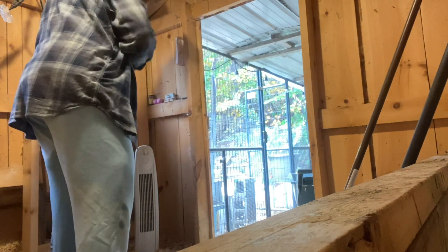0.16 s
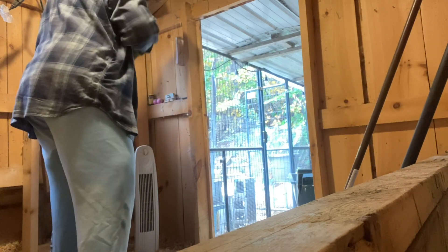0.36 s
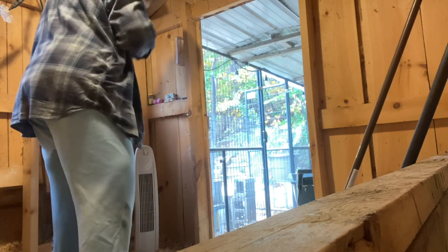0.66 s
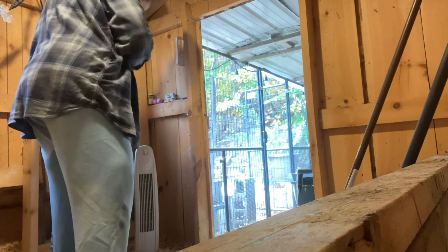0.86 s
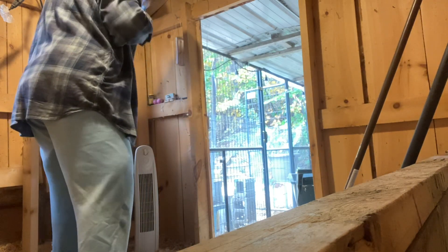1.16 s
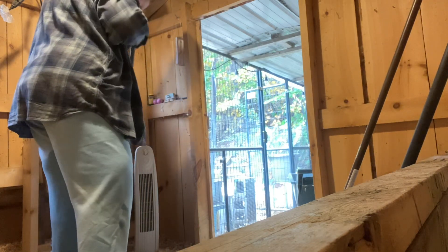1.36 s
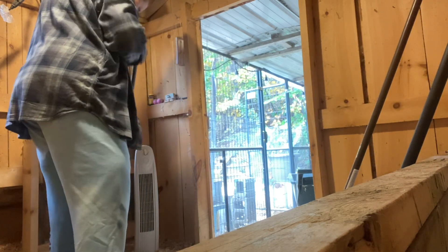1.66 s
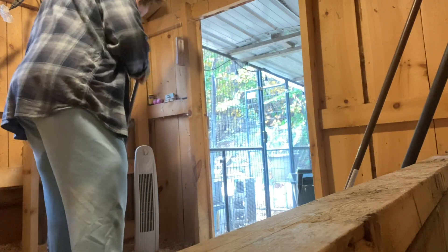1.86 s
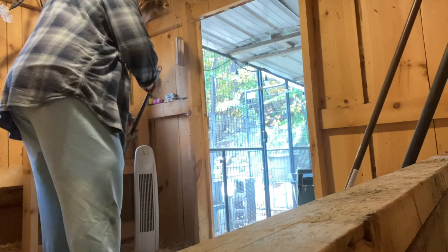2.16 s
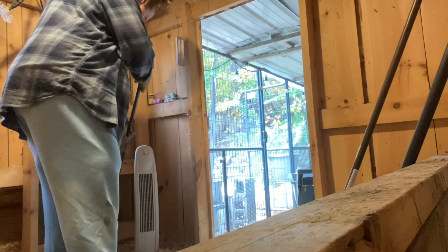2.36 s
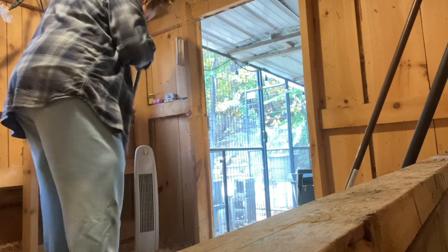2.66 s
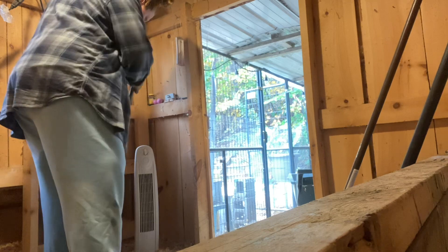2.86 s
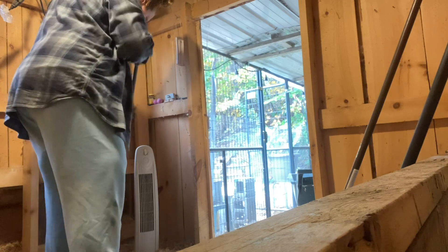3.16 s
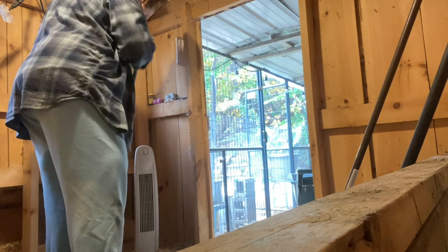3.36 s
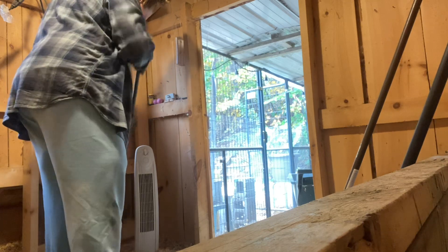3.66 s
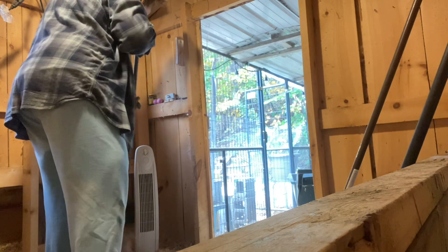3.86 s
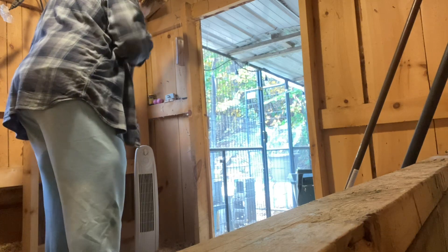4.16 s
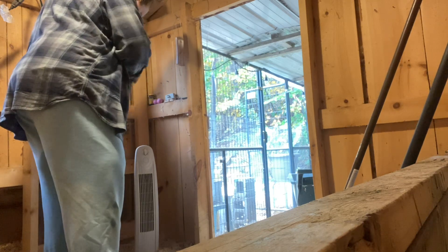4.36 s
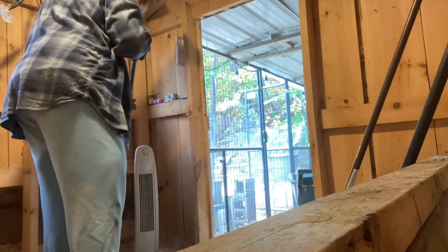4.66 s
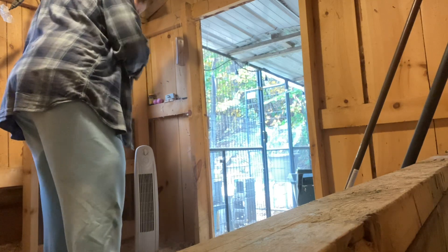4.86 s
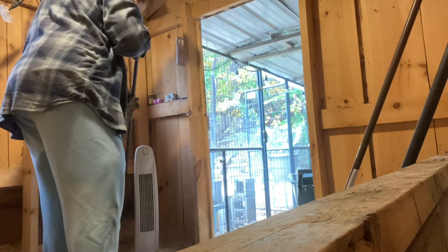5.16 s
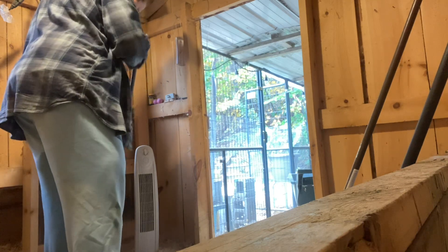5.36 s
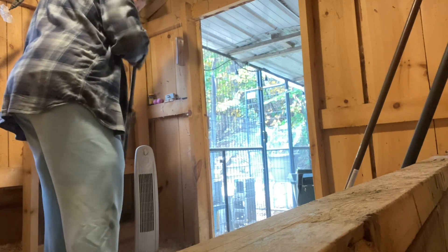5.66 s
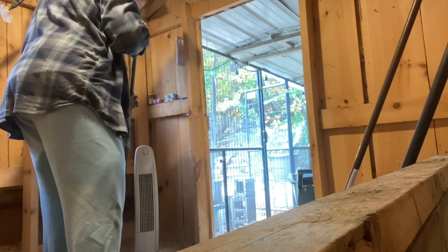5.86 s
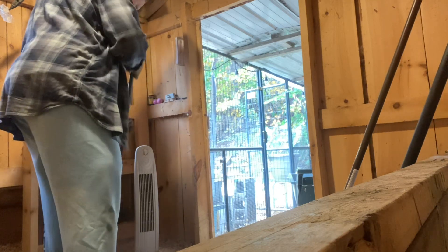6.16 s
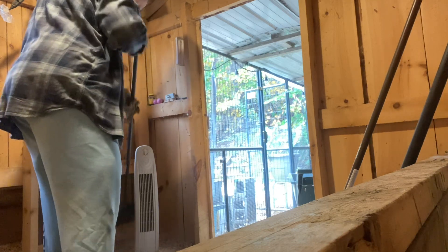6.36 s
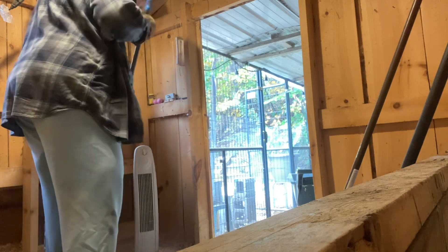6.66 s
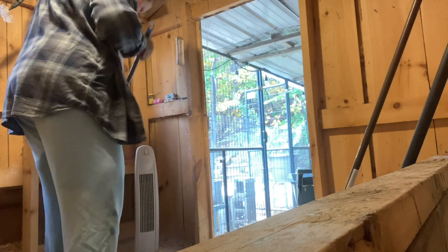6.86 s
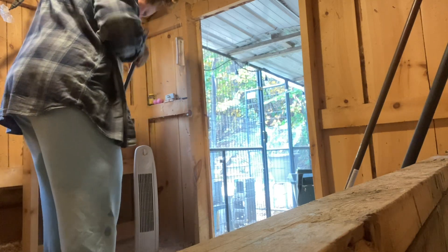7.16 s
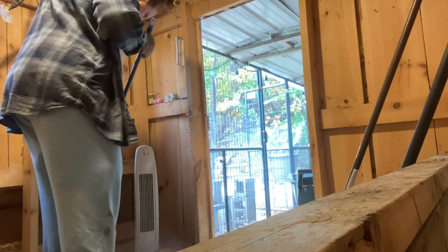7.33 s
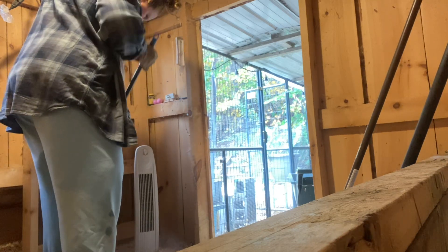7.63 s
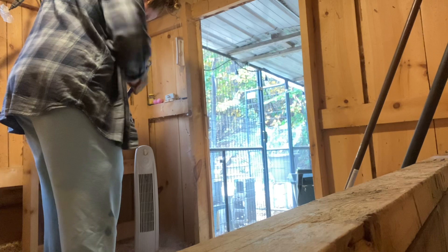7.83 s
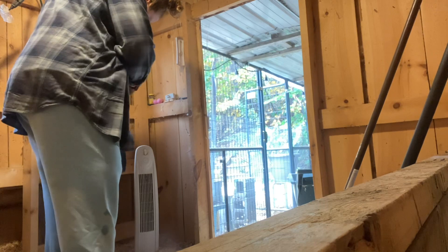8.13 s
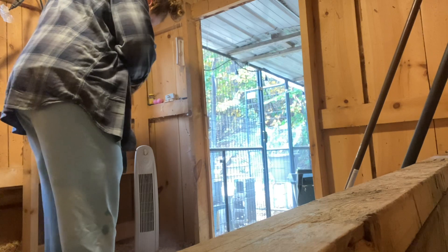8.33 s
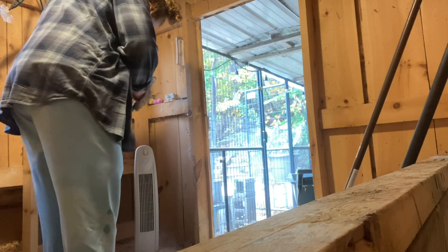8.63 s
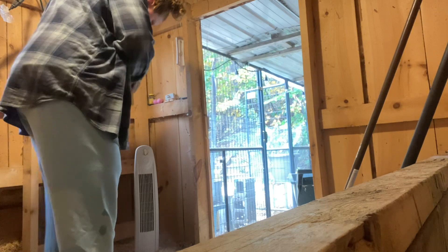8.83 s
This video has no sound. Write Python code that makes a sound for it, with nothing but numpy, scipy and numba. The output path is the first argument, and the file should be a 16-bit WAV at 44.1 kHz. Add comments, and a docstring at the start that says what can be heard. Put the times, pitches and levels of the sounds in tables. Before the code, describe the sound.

A stiff broom sweeps the plank floor of a small wooden coop in quick, scratchy strokes over a low rumble of feet. The broom head knocks on a hollow panel now and then. About two thirds through, the handle cracks sharply against the wall, two faint bird notes follow outside, and the sweeping carries on. It is heard in stereo, with a short echo and a faint outdoor hush.

```python
"""A stiff broom sweeps the plank floor of a small wooden coop, heard by two microphones a little apart.
From the start, bristles hiss and drag on the boards over a rumble of feet and a faint outdoor hush.
From 0.8 s on, the broom head now and then knocks on a hollow panel. At 6.4 s the handle cracks against
the wall, two faint bird notes follow outside, and the sweeping goes on to the end.
The walls add a short echo, and a limiter holds down the loudest knocks."""
import sys
import numpy as np
from scipy import signal
from scipy.fft import rfft, irfft, next_fast_len
from scipy.io import wavfile
from scipy.ndimage import uniform_filter1d, minimum_filter1d
from numba import njit

SR = 44100
rng = np.random.default_rng(int(sys.argv[2]) if len(sys.argv) > 2 else 0)


def bounce(signal):
    """Save signal as a 16-bit WAV file at the path given by the first command-line argument."""
    frames = np.transpose(np.atleast_2d(signal))
    limited = np.clip(frames, -1, 1)
    pcm = np.round(limited * 32767).astype(np.int16)
    wavfile.write(sys.argv[1], SR, pcm)


N = 396459
TIME_S = np.arange(N) / SR
SIZE = next_fast_len(N + SR)
HZ = np.arange(SIZE // 2 + 1) * SR / SIZE

# The broom head hits the panel: start_s, blow_db, upper_twin_db, low_overtones_db, high_overtones_db,
# boom_db, joists_db. The boom has its own level; the other parts are added to blow_db.
KNOCKS = [(0.807, -3, 2.5, -10, -27, -61, 2), (0.861, -11.5, 4, -14, -15, -64, -12),
          (0.915, -27.5, 4, -17, -9, -57, -3), (1.948, 3, -0.5, -13, -11, -14.5, 2),
          (2.492, -13.5, 0, -16.5, -17, -52, -7.5), (2.741, -23, -22, -23, -27, -23.5, 8.5),
          (2.976, 2.5, -2.5, -15, -25, -46.5, -6), (3.017, -25, -23, 0.5, -7, -51, 2),
          (3.058, -10.5, -1.5, -14.5, -21.5, -53, 2.5), (3.333, -4.5, 0, -23.5, -26, -38.5, 3),
          (3.375, -14.5, -3.5, -22, -42, -40, -2), (3.494, -27, -8.5, -3, -11, -45.5, -4),
          (4.294, 4.5, -2, -17, -24, -51, -7), (4.445, -29.5, -3, -27, -42, -42.5, 0),
          (5.497, 2, 0.5, -10, -9.5, -30.5, -1), (5.54, -17, 4.5, -1.5, -12.5, -55, 3),
          (5.592, -25.5, 10, -20, -16.5, -57.5, 0), (5.642, -26.5, 5.5, -27, -32, -59, 1.5),
          (6.154, 3.5, 0.5, -6.5, -16, -46, 3), (7.826, -23.5, -25, 1, -17, -28, 2),
          (7.878, 3.5, -3, -11, -30, -29, 0.5), (7.923, -29, -24, -7, -11, -32, -4),
          (7.959, -30, 2, -13, -23, -50, 1)]


def undb(db):
    """Turn decibels into a gain."""
    return 10 ** (np.asarray(db, float) / 20)


def unit(x):
    """Scale to an average (rms) level of 1."""
    return x / np.sqrt(np.mean(x ** 2))


def curve(table):
    """Join rows of pitch_hz, level_db into a gain for every frequency."""
    hz, db = np.transpose(table)
    return undb(np.interp(np.log(HZ + 1), np.log(hz), db))


def colour(x, gain):
    """Filter by a gain for each frequency."""
    return irfft(rfft(x, SIZE) * gain, SIZE)[..., :N]


def only(x, kind, hz):
    """Let only a band, or only the highs, through."""
    return signal.sosfilt(signal.butter(2, hz, kind, fs=SR, output="sos"), x)


def walk(rate_hz):
    """A smooth random wobble, about 1 in size."""
    hold = int(SR / rate_hz)
    steps = np.repeat(rng.standard_normal(N // hold + 1), hold)
    return unit(uniform_filter1d(uniform_filter1d(steps, hold), hold)[:N])


def blows(times, db, contact_s=0):
    """One smooth push at each time; longer contact sounds duller."""
    x = np.zeros(N)
    x[np.clip((times * SR).astype(int), 0, N - 1)] = undb(db)
    push = np.hanning(int(contact_s * SR) + 3)
    return np.convolve(x, push / push.sum())[:N]


def fading(x, fade_s):
    """Each push dies away, by 60 dB in fade_s."""
    return signal.lfilter([1], [1, -np.exp(-np.log(1000) / (fade_s * SR))], x)


def burst(x, fade_s, low_hz, high_hz):
    """Each push sets off a short tail of noise."""
    return only(fading(x, fade_s) * rng.standard_normal(N), "band", [low_hz, high_hz])


def ring(x, tones):
    """Struck wood rings in fading tones of alternating sign; x may hold one row for each tone."""
    out, pushes = 0, np.broadcast_to(x, (len(tones), N))
    for k, (hz, db, fade_s) in enumerate(tones):
        decay, angle = np.exp(-np.log(1000) / (fade_s * SR)), 2 * np.pi * hz / SR
        tone = signal.lfilter([0, decay * np.sin(angle)], [1, -2 * decay * np.cos(angle), decay ** 2],
                              pushes[k])
        out = out + (-1) ** k * undb(db) * tone
    return out


@njit
def moving_band(x, hz, width_hz):
    """Let through a band whose centre may move every sample."""
    out, band_state, low_state = np.empty(len(x)), 0., 0.
    for i in range(len(x)):
        step, damping = np.pi * hz[i] / SR, width_hz / hz[i]
        band = (band_state + step * (x[i] - low_state)) / (1 + step * (step + damping))
        band_state = 2 * band - band_state
        low_state += 2 * step * band
        out[i] = damping * band
    return out


def wandering_bands(x, bands, rate_hz):
    """Rubbed resonances: each drifts about 11% in pitch, and swells and fades on its own."""
    out = 0
    for hz, width_hz, db in bands:
        centre_hz = hz * np.exp(0.11 * walk(rate_hz))
        band = unit(np.array([moving_band(row, centre_hz, float(width_hz)) for row in x]))
        out = out + band * undb(db + 2.2 * walk(rate_hz))
    return out


def touch(start, length, press, lift, step=1):
    """For each stroke: how firmly it touches and how far along it is, both 0 to 1."""
    since, length = TIME_S[::step] - start[:, None], length[:, None]
    down = np.clip(since / np.maximum(np.reshape(press, (-1, 1)), .01), 0, 1)
    up = np.clip((length - since) / np.maximum(np.reshape(lift, (-1, 1)), .01), 0, 1)
    return (np.sin(np.pi / 2 * down) * np.sin(np.pi / 2 * up)) ** 2, np.clip(since / length, 0, 1)


def yard():
    """A faint outdoor hush, unrelated left and right."""
    # Colour of the hush: pitch_hz, level_db
    hush = [(24, -24.5), (40, -7.5), (88, 6), (391, -25), (1210, -31.5), (8370, -52.5), (10200, -55),
            (11800, -46), (14000, -63)]
    return unit(colour(rng.standard_normal((2, N)), curve(hush))) * undb(-63.5)


def birds():
    """Two soft notes outside: a low one that sags, then a high steady one."""
    # Bird notes: start_s, length_s, pitch_hz, fall_hz, level_db, octave_db
    notes = [(6.55, .13, 560, 40, -54, -4), (6.71, .1, 3050, 0, -71, -40)]
    out = 0
    for start, length, hz, fall_hz, db, octave_db in notes:
        progress = np.clip((TIME_S - start) / length, 0, 1)
        phase = 2 * np.pi * length * (hz * progress - fall_hz * progress ** 2 / 2)
        tone = np.sin(phase) + undb(octave_db) * np.sin(2 * phase)
        out = out + undb(db) * np.sin(np.pi * progress) * tone
    return out


def floor_rumble():
    """The floor rumbles under the feet and shudders after each knock."""
    # Colour of the rumble: pitch_hz, level_db
    depth = [(20, -32), (35, -8.5), (50, -8), (75, 0.5), (130, -11), (170, -4.5), (300, -19.5), (600, -75)]
    # Rumble of the feet: time_s, level_db
    feet = [(0.0, -50.5), (0.75, -50), (0.9, -44.5), (1.33, -62), (1.65, -49), (2.15, -44.5), (2.45, -48),
            (2.73, -50), (2.95, -43.5), (3.1, -49.5), (4.23, -59.5), (4.41, -56), (5.06, -49), (5.3, -54.5),
            (5.6, -46.5), (6.0, -52), (6.41, -35.5), (6.79, -65.5), (7.76, -56), (8.01, -48), (8.19, -51.5),
            (8.99, -48)]
    rumble = unit(colour(rng.standard_normal((2, N)) * undb(2 * walk(6)), curve(depth)))
    start, blow_db = np.transpose(KNOCKS)[:2]
    shudder = fading(blows(start, blow_db - 38.5, 0.0061), fade_s=1)
    return rumble * (undb(np.interp(TIME_S, *np.transpose(feet))) + shudder)


def board_hums():
    """Single boards hum with a wavering tone while they are rubbed."""
    # Humming boards: start_s, length_s, pitch_hz, level_db
    hums = [(0.0, 0.29, 585, -40), (0.313, 0.21, 570, -47), (0.543, 0.25, 369, -41.5),
            (1.254, 0.2, 161, -53), (3.744, 0.2, 333, -41.5), (3.736, 0.3, 163.4, -47),
            (4.08, 0.18, 323, -33.5), (4.563, 0.27, 330, -42.5), (5.047, 0.099, 352, -38.5),
            (5.79, 0.18, 144, -40), (6.5, 0.3, 100, -40.5), (6.868, 0.275, 262.8, -42),
            (6.994, 0.27, 110.5, -45), (7.225, 0.3, 148.9, -47.5), (7.255, 0.26, 296, -44),
            (7.655, 0.17, 291, -30), (8.143, 0.17, 588, -47.5), (8.383, 0.28, 575, -45),
            (8.45, 0.19, 240, -41), (8.63, 0.24, 857, -53.5), (8.859, 0.14, 585, -35)]
    start, length, hz, db = np.transpose(hums)
    waver_hz, fade_s = 24, 0.1
    waver = signal.lfilter(*signal.butter(2, waver_hz, fs=SR), rng.standard_normal((2, N)))
    tones = np.cos(2 * np.pi * hz[:, None] * TIME_S + 1.23 * unit(waver[0])) * undb(2.3 * unit(waver[1]))
    contact, _ = touch(start, length, fade_s, fade_s)
    return undb(db) @ (contact * tones)


def ticks():
    """Bristles, grit and the broom head make tiny hard clicks."""
    # Hard contacts: start_s, level_db, brightness_db
    contacts = [(0.801, -40, -13), (1.0002, -32, -35), (1.4548, -52, -24), (1.531, -45, -27),
                (1.811, -43, -18), (1.9454, -51, -12), (1.996, -39, -37), (2.97, -57, -20),
                (3.328, -40, -13), (3.487, -40.5, -17), (3.835, -52, -14), (4.287, -35.5, -34),
                (4.871, -38, -25), (5.203, -51, 3), (6.1474, -51, -20), (6.837, -48, -2), (7.39, -55, -16),
                (7.876, -32, -25), (8.9115, -53, -20)]
    start, db, bright_db = np.transpose(contacts)
    grit, fade_s = rng.standard_normal((2, N)), 0.045
    body = unit(only(grit[0], "band", [900, 3200]))
    edge = unit(np.diff(grit[1], prepend=0)) * undb(-2.5)
    return fading(blows(start, db), fade_s) * body + fading(blows(start, db + bright_db), fade_s) * edge


def swishes_and_cracks():
    """Short grainy swishes of straw, and brief sharp cracks as the broom head hits the panel."""
    # Swishes and cracks: start_s, length_s, pitch_hz, width_hz, rise_octaves, level_db
    sounds = [(0.755, 0.079, 3500, 2500, 0.053, -55), (1.454, 0.081, 2050, 500, 0.03, -55),
              (2.228, 0.1, 4500, 3000, 0, -49), (2.434, 0.031, 2200, 500, 0, -42),
              (2.443, 0.067, 3600, 900, .3, -48.5), (2.749, 0.14, 500, 704, 0, -38.5),
              (2.756, 0.095, 1990, 1500, 0, -43), (3.572, 0.088, 3870, 2500, 0, -42.5),
              (3.832, 0.092, 3380, 1800, 0.25, -44), (4.958, 0.083, 4050, 700, 0.037, -54.5),
              (4.97, 0.04, 2040, 500, 0, -51), (5.037, 0.038, 2100, 500, 0, -50),
              (5.192, 0.092, 3530, 2560, 0, -49), (5.44, 0.037, 2000, 594, 0.44, -47),
              (5.06, 0.035, 450, 250, 0.042, -47), (7.839, 0.037, 500, 400, 0, -38),
              (5.484, 0.012, 880, 490, 0.032, -25), (5.493, 0.0049, 2200, 880, 0.13, -22.5),
              (5.922, 0.041, 2200, 352, 0, -52), (6.19, 0.22, 4330, 2500, 0.044, -59),
              (7.005, 0.061, 2270, 400, 0.074, -62), (7.6, 0.033, 4500, 2500, 0, -50),
              (7.718, 0.11, 2150, 500, .1, -56), (7.811, 0.039, 1660, 1780, 0.035, -36.5),
              (7.876, 0.003, 2270, 810, 0.067, -26.5), (7.877, 0.0065, 5440, 5000, 0.038, -45)]
    grit = rng.standard_normal(N) * undb(0.6 * np.minimum(rng.exponential(size=N), 6))
    out = np.zeros(N)
    for start, length, hz, width_hz, rise, db in sounds:
        progress = np.linspace(0, 1, int(length * SR))
        span = slice(int(start * SR), int(start * SR) + len(progress))
        centre_hz = hz * 2 ** (rise * (progress - .5))
        band = moving_band(grit[span], centre_hz, float(width_hz))
        band = unit(moving_band(band, centre_hz, 2. * width_hz))
        out[span] += undb(db) * np.sin(np.pi * progress ** 0.74) * band
    return out


def handle_rap():
    """The handle grazes, hits and rebounds harder: the wall rings and loose boards rattle."""
    # Handle on the wall: start_s, blow_db
    raps = [(6.383, -14)]
    # Tones of the wall planks: pitch_hz, level_db, fade_s
    wall = [(309, 9.5, 0.24), (360, 19, 0.195), (430.4, 15, 0.28), (575, -13.5, 0.73), (670, -18, 0.25),
            (1110, -23, 0.15), (1120, 17.5, 0.066), (1310, 7, 0.1), (1790, 3, 0.058)]
    start, db = np.transpose(raps)
    graze = blows(start - .008, db - 22, 0.00042)
    hit = blows(start - .004, db - 14.5, 0.0007)
    rebound = blows(start - .0005, db - 12.5, 0.00033)
    push = graze + hit + rebound
    rattle = burst(push, 0.21, 200, 640) * undb(22)
    crack = burst(push, 0.056, 770, 3330) * undb(12.5)
    snap = burst(blows(start - .004, db), 0.075, 3300, 14000) * undb(-17)
    tail = burst(push, 0.62, 1100, 8500) * undb(-21)
    return ring(push, wall) * undb(-7.5) + rattle + crack + snap + tail


def panel_knocks():
    """The broom head hits a hollow panel: two close tones throb, and the wood around them joins in."""
    # Ringing parts, each with: pitch_hz, level_db, fade_s
    twins = [(245.4, -2, 0.13), (278.2, 1.5, 0.091)]  # the panel's two close tones
    overtones = [(335, 6.5, 0.042), (427, 3, 0.014), (390, 1, 0.036), (533, -9, 0.05), (587, -9.5, 0.044),
                 (697, -8, 0.088), (730, -2.5, 0.044), (884, -6.5, 0.064), (990, -21, 0.018),
                 (1120, -18, 0.04), (1244, -17, 0.054)]  # its higher tones
    lath = [(319, -9.5, 0.044), (410, -13.5, 0.034)]  # a loose strip on it, struck first
    head = [(848, -6, 0.04)]  # the block of the broom head
    joists = [(75, -25, 0.17), (131.4, -23.5, 0.26), (193, -23.5, 0.062)]  # the beams underneath
    floor = [(47.5, 5, 1)]  # the raised floor
    start, db, upper_db, low_db, high_db, boom_db, joist_db = np.transpose(KNOCKS)
    start = start - .003  # contact comes just before the throb peaks
    chatter = burst(blows(start + .016, db - 33.5, 0.016), 0.21, 201, 800)  # the panel shakes on its nails
    lower = blows(start, db + 5, 0.0021) + chatter
    upper = blows(start, db + upper_db + 7, 0.002367) + chatter
    clack = ring(blows(start - .002, db, 0.0027) + chatter, lath)
    hollow = only(ring([lower, upper], twins) + clack, "band", [205, 400])  # the space behind the panel
    spot_db = 1.8 * rng.standard_normal((len(start), len(overtones)))  # each blow lands on another spot
    grind = rng.standard_normal(N)  # the head grinds on the wood before it leaves
    pushes = []
    for k, (hz, _, _) in enumerate(overtones):
        push_db = db - 20.5 + (low_db if hz < 650 else high_db) + spot_db[:, k]
        pushes.append(grind * fading(blows(start, push_db), 0.04 / (1 + k / 8)))
    ringing = only(ring(pushes, overtones), "high", 300)
    rattle = burst(blows(start, db + low_db + 3, 0.0011), 0.21, 490, 653)
    rattle += burst(blows(start, db + high_db + 6, 0.0044), 0.1, 650, 1150)
    block = ring(blows(start - .002, db + high_db, 0.00065), head)
    thud = ring(blows(start, db + joist_db, 0.0052), joists)
    boom = ring(blows(start, boom_db, 0.025), floor)
    return hollow + ringing + rattle + block + thud + boom


def stroke_gains():
    """How strongly the strokes drive hiss, bristle tips and drag; overlapping strokes add in power."""
    # Strokes: start_s, length_s, press_s, lift_s, first_hiss_db, last_hiss_db, tips_db, drag_db
    strokes = [(-0.033, 0.37, 0.03, 0.012, -42, -45, 4.5, -38),
               (0.302, 0.17, 0.084, 0.2, -34, -39, 11, -29),
               (0.334, 0.44, 0.16, 0.0095, -49, -43, 3.5, -47),
               (0.731, 0.41, 0.045, 0.12, -47.5, -40.5, 4.5, -40.5),
               (1.076, 0.44, 0.22, 0.3, -45.5, -53, 8.5, -47),
               (1.337, 0.3, 0.23, 0.05, -45.5, -45, 0, -40.5),
               (1.586, 0.23, 0.049, 0.042, -47, -47, -1, -39),
               (1.783, 0.28, 0.037, 0.099, -44, -42.5, 4, -45), (1.97, 0.27, 0.043, 0.17, -46, -55, 4, -39),
               (2.121, 0.26, 0.041, 0.14, -50.5, -35, 5, -34.5),
               (2.343, 0.3, 0.14, 0.19, -38.5, -40.5, 7.5, -38.5),
               (2.593, 0.36, 0.013, 0.16, -57.5, -24.5, 4, -37),
               (2.924, 0.35, 0.17, 0.012, -25, -58, 6, -38), (3.229, 0.33, 0.11, 0.043, -48, -44, 6.5, -43),
               (3.525, 0.31, 0.06, 0.089, -43.5, -44, 9, -40.5),
               (3.795, 0.26, 0.067, 0.046, -47.5, -54, 14, -70),
               (3.963, 0.39, 0.14, 0.073, -52, -43, 2, -45),
               (4.238, 0.43, 0.27, 0.13, -51, -46, 6.5, -43.5),
               (4.576, 0.2, 0.22, 0.014, -51, -46, 8.5, -46), (4.768, 0.4, 0.023, 0.12, -45, -45, 5.5, -40),
               (5.081, 0.46, 0.16, 0.11, -58, -41, 6.5, -45),
               (5.524, 0.29, 0.037, 0.21, -54, -35, 5.5, -33.5),
               (5.761, 0.41, 0.0094, 0.22, -67, -28, 2.5, -42),
               (6.034, 0.316, 0.17, 0.064, -44, -46.5, 6, -37),
               (6.756, 0.36, 0.12, 0.088, -46.5, -51, 1.5, -43.5),
               (7.074, 0.29, 0.063, 0.21, -51.5, -54, 0, -47.5),
               (7.267, 0.32, 0.024, 0.018, -63.5, -51, -6, -54.5),
               (7.568, 0.24, 0.033, 0.077, -49, -52.5, 7, -47), (7.657, 0.29, 0.21, 0.12, -42, -38, 7, -38),
               (7.889, 0.26, 0.02, 0.14, -55.5, -47, 8, -40.5),
               (8.055, 0.37, 0.2, 0.27, -40.5, -60, 6, -42.5),
               (8.373, 0.28, 0.14, 0.17, -48.5, -44.5, 6.5, -35.5),
               (8.551, 0.29, 0.18, 0.091, -52, -44, 5.5, -43.5),
               (8.793, 0.25, 0.14, 0.055, -50.5, -40.5, 1.5, -43)]
    start, length, press, lift, first_db, last_db, tip_db, drag_db = np.transpose(strokes)
    step, linger_s, rest_db = 16, 0.021, -52.5
    contact, progress = touch(start, length, press, lift, step)
    swell = undb(last_db - first_db)[:, None] ** (progress - .5)
    power = (contact * swell) ** 2
    hiss = power * undb(first_db + last_db)[:, None]
    drag = uniform_filter1d(undb(2 * drag_db) @ power, int(linger_s * SR) // step + 1)
    drag += undb(2 * rest_db)  # the boards keep stirring between strokes
    gains = np.sqrt([hiss.sum(axis=0), undb(2 * tip_db) @ hiss, drag])
    return np.repeat(gains, step, axis=1)[:, :N]


def broom():
    """Thousands of bristle slips a second hiss and shake the boards; one row for each end of the head."""
    # Colours of the bristle hiss and the dragged boards: pitch_hz, level_db
    bristles = [(500, 9.5), (1000, 0), (2000, 4.5), (3000, 1.5), (4500, 1.5), (6500, -3.5), (9000, -11.5),
                (12000, -9.5), (15000, -17)]
    boards = [(60, -38), (150, 4), (230, 4), (300, 0), (420, -7), (600, -8), (720, -39), (860, -26),
              (1300, -38.5), (2500, -54.5)]
    # Resonances, each with: pitch_hz, width_hz, level_db
    wood = [(285, 5.1, -8.5), (277.5, 35, 8.5), (314.7, 11, 11.5), (883, 110, 9.5), (4150, 2100, -1.5)]  # rubbed planks and broom head
    straw = [(900, 350, -35.5), (1230, 170, -17), (1830, 1200, -19), (2300, 460, -16), (2700, 1400, -32),
             (3470, 1800, -32.5), (4260, 970, -33), (6440, 430, -22.5)]  # bunches of straw that catch on their own
    planks = [(155.4, 4.3, -17.5), (238.6, 8.9, -17.5), (350, 45, -14.5), (401, 22, -21.5),
              (565, 46, -20.5), (824, 150, -19)]  # planks that answer in turn
    wood_gain = undb(sum(db / (1 + (2 * (HZ - hz) / width) ** 2) for hz, width, db in wood))
    body_gain, tip_gain, drag_gain = stroke_gains()
    slips = rng.standard_normal((2, N))
    slips *= undb(2.5 * np.minimum(rng.exponential(size=N), 6) + 2.2 * walk(40))
    hiss = unit(colour(slips, curve(bristles) * wood_gain)) * undb(-4.5)
    body = colour(hiss, 1 / (1 + (HZ / 4500) ** 4))
    tips = hiss - body
    rasp = wandering_bands(slips, straw, rate_hz=12)
    scrape = rng.standard_normal((2, N)) * undb(1.4 * walk(30))
    drag = unit(colour(scrape, curve(boards) * wood_gain)) * undb(-3.5)
    drag += wandering_bands(scrape, planks, rate_hz=6)
    return (body + rasp) * body_gain + tips * tip_gain + drag * drag_gain


def coop_echo(x):
    """The plank walls echo briefly; the broom moves between spots, each with its own echo."""
    # Colour of the echo: pitch_hz, level_db
    walls = [(50, -20), (130, -9), (260, -16), (450, -4), (650, -2), (1000, -4), (2000, -4), (5000, -5),
             (7500, -14), (10000, -28), (15000, -28)]
    spots, move_s, fade_s = 4, .3, .085
    t = TIME_S[:SR // 2]
    shape = np.exp(-np.log(1000) * t / fade_s) * np.clip(t / 0.00051, 0, 1)
    echoes = rng.standard_normal((spots, 2, len(t))) * shape
    echoes /= np.sqrt(np.sum(echoes ** 2, axis=2, keepdims=True))
    away = (TIME_S / move_s - np.arange(spots)[:, None]) % spots - 1
    shares = np.cos(np.pi / 2 * np.clip(away, -1, 1)) * x
    spectrum = (rfft(shares, SIZE)[:, None] * rfft(echoes, SIZE)).sum(axis=0)
    return irfft(spectrum * curve(walls), SIZE)[:, :N] * undb([[0], [-3]])


def scene():
    """Mix it all; the right microphone hears it later, and partly from the broom's other end."""
    # Right microphone against left: pitch_hz, delay_cycles, level_db, likeness (0 to 1)
    right_side = [(0, 0, 0, .97), (90, .045, -1, .88), (200, .11, -5.5, .85), (290, .155, -6.2, .85),
                  (450, .23, -3, .7), (620, .33, -1, .5), (760, .15, -2, .55), (880, 0, -3, .6),
                  (1030, .25, -3.5, .55), (1200, .5, -4, .55), (2100, 1, -4.5, .5), (4200, 2, -4, .35),
                  (5300, 2.4, -4, .4), (7000, 2.84, -3.5, .5), (8200, 3, -.5, .8), (10300, 3.5, 0, .96),
                  (13200, 4, 0, .96), (15500, 4.6, 0, .85)]
    events = panel_knocks() + handle_rap() + ticks() + swishes_and_cracks() + board_hums() + birds()
    near_end, far_end = broom() + floor_rumble()
    left = near_end + events
    hz, *columns = np.transpose(right_side)
    delay_cycles, db, likeness = (np.interp(HZ, hz, column) for column in columns)
    sweeping = likeness * rfft(near_end, SIZE) + np.sqrt(1 - likeness ** 2) * rfft(far_end, SIZE)
    path = undb(db) * np.exp(-2j * np.pi * delay_cycles)
    right = irfft((sweeping + rfft(events, SIZE)) * path, SIZE)[:N]
    return np.array([left, right]) + coop_echo(left) + yard()


def record(dry):
    """A limiter turns both sides down just ahead of each loud peak; the highest treble is cut."""
    ceiling, release_s, top_hz = .92, 0.0047, 14800
    excess = np.log(np.maximum(np.abs(dry).max(axis=0), ceiling) / ceiling) + 1e-9
    release = TIME_S / release_s
    cut = np.exp(np.maximum.accumulate(np.log(excess) + release) - release)  # each cut dies away
    hold = int(0.001 * SR)
    gain = uniform_filter1d(minimum_filter1d(np.exp(-cut), size=2 * hold + 1), size=hold)
    return signal.sosfilt(signal.ellip(12, .2, 80, top_hz, fs=SR, output="sos"), dry * gain)


dry = scene()
out = record(dry)
bounce(out)
```